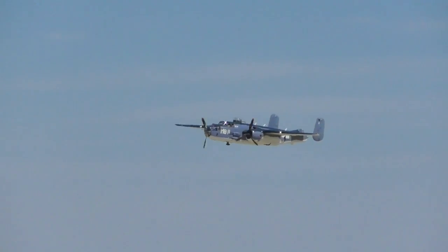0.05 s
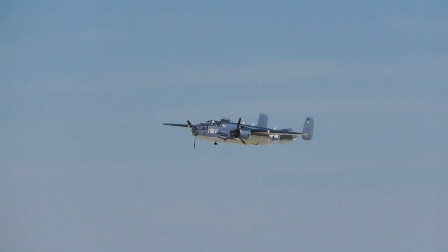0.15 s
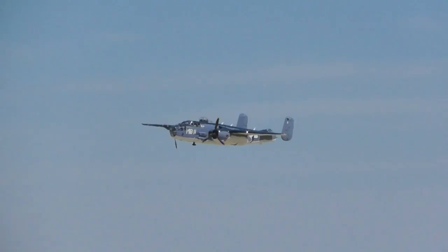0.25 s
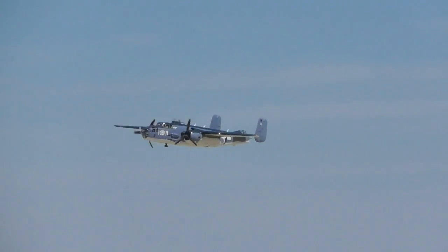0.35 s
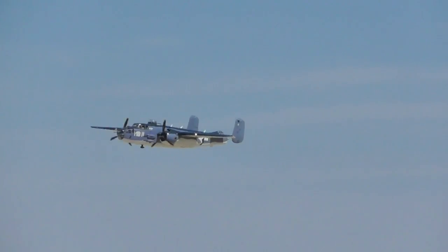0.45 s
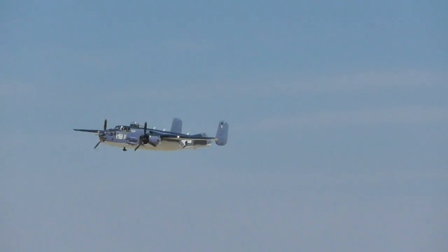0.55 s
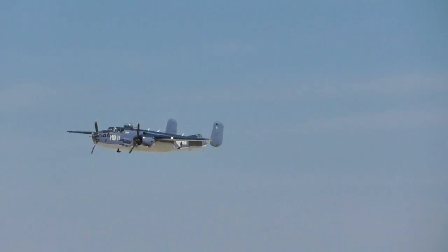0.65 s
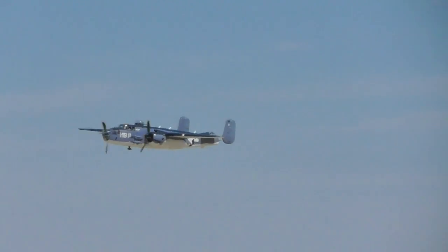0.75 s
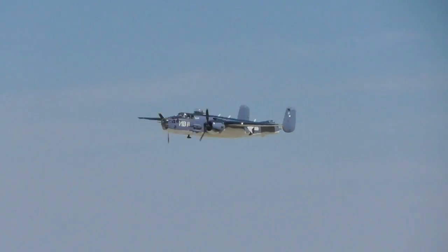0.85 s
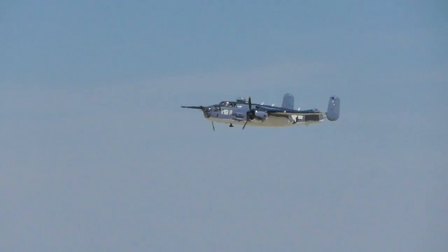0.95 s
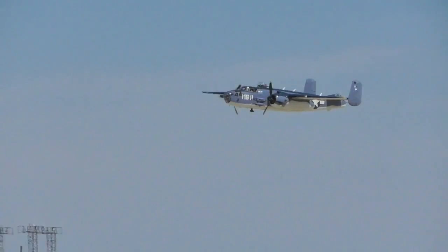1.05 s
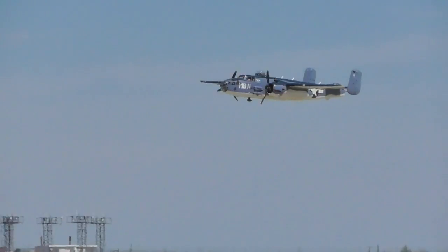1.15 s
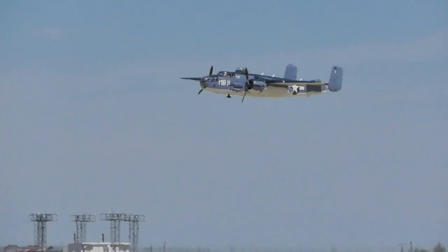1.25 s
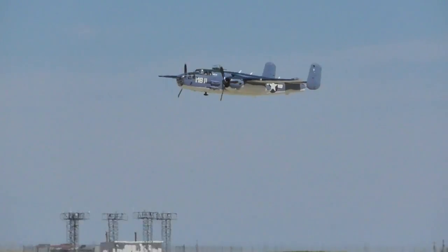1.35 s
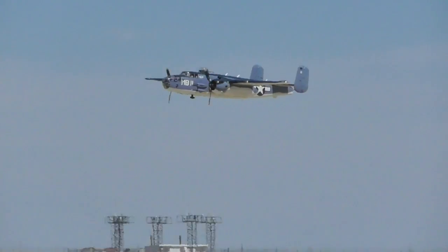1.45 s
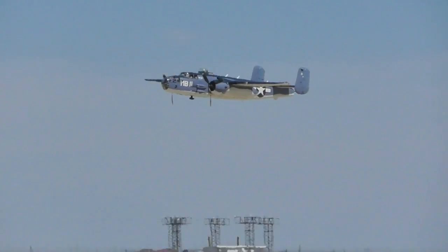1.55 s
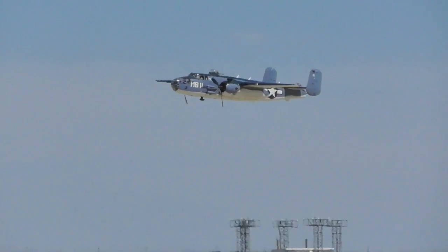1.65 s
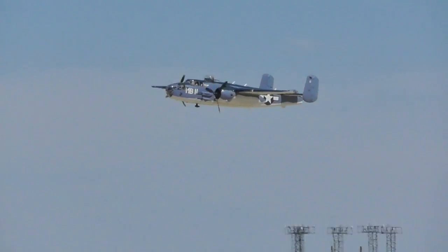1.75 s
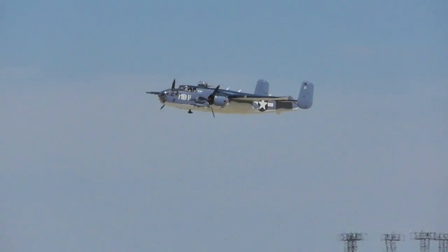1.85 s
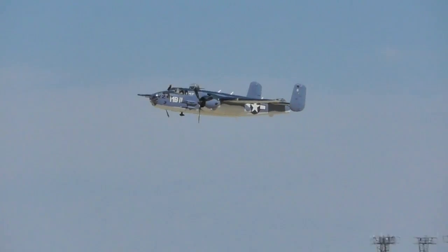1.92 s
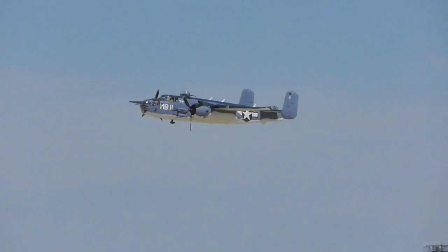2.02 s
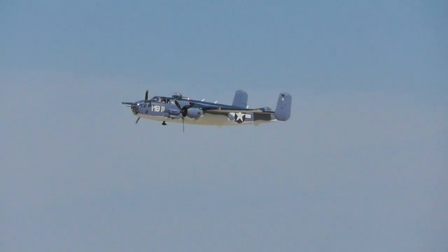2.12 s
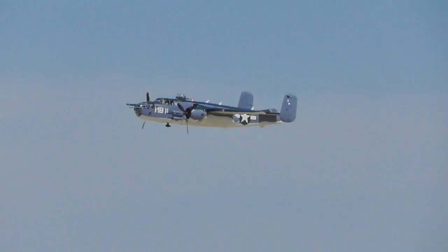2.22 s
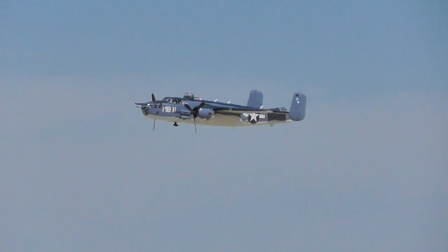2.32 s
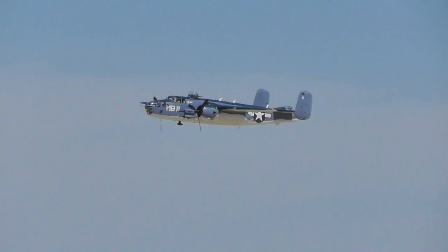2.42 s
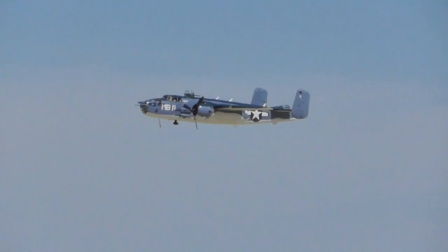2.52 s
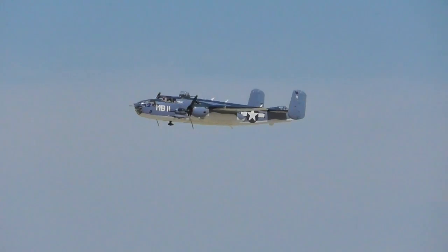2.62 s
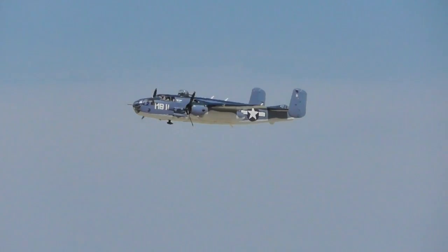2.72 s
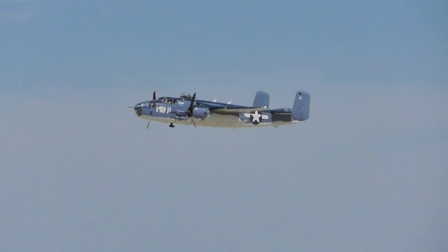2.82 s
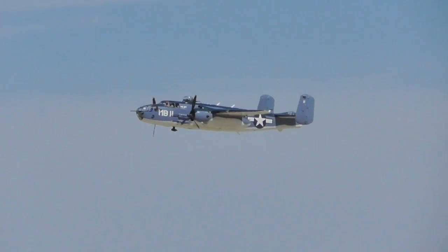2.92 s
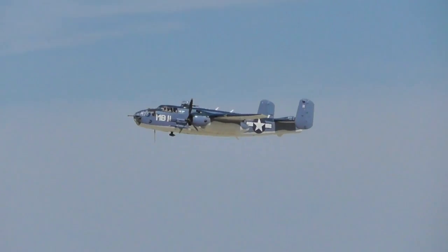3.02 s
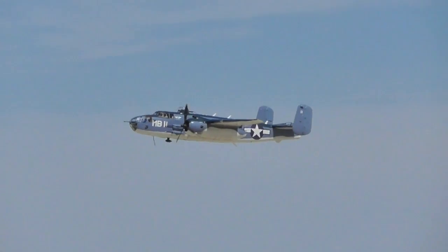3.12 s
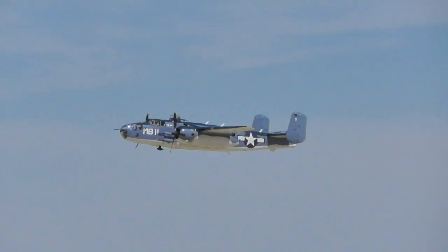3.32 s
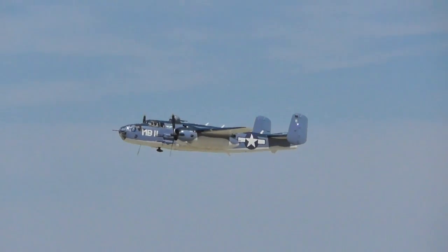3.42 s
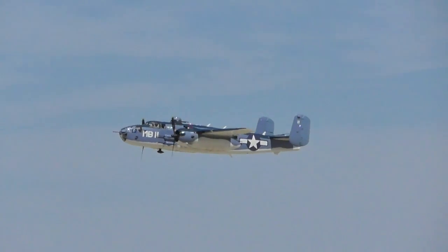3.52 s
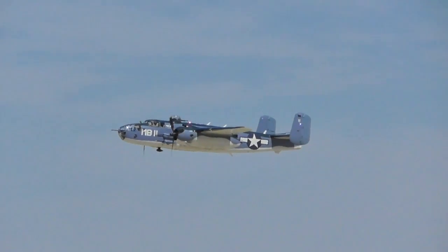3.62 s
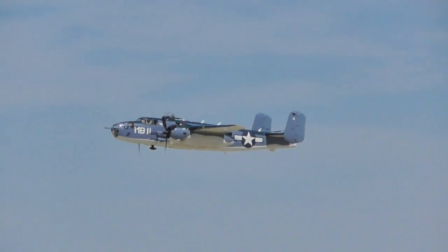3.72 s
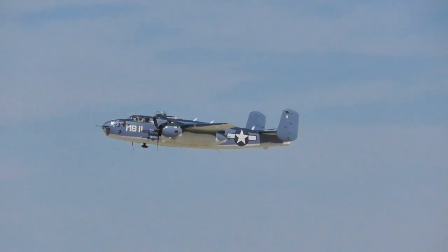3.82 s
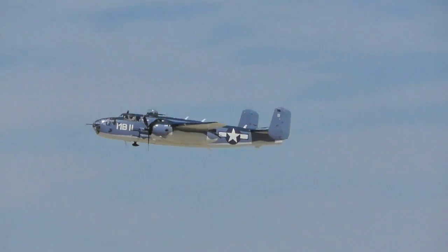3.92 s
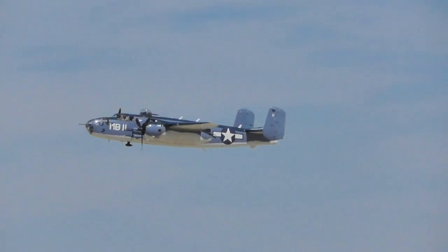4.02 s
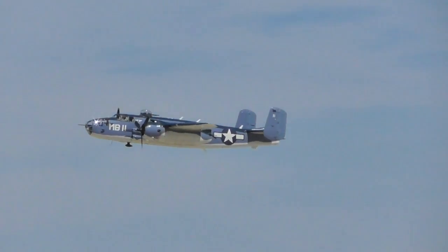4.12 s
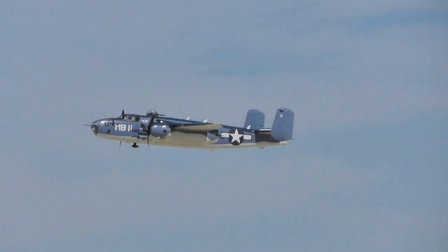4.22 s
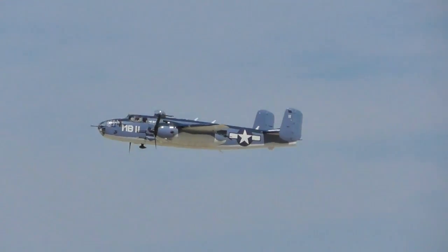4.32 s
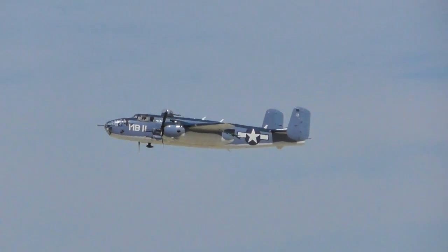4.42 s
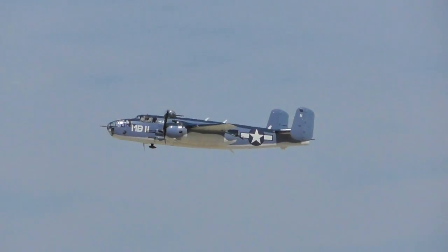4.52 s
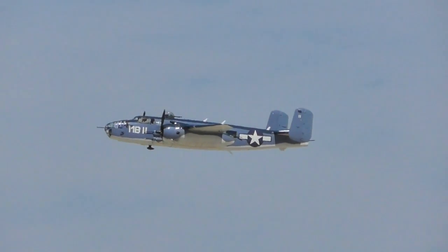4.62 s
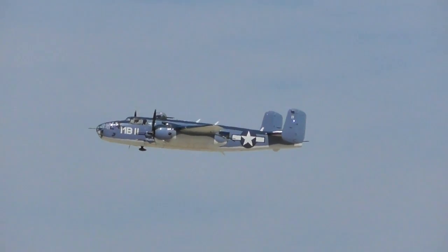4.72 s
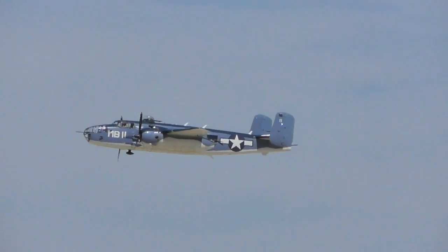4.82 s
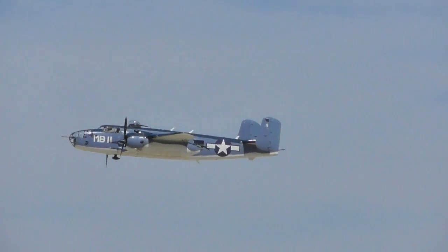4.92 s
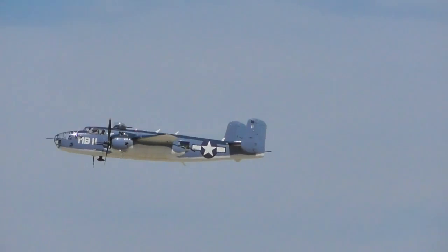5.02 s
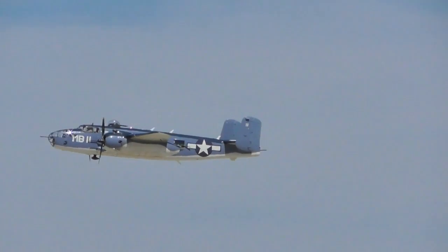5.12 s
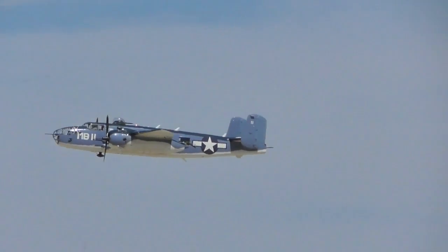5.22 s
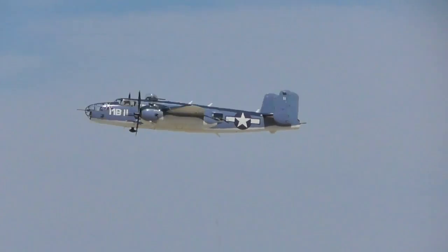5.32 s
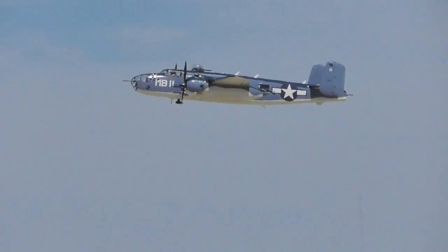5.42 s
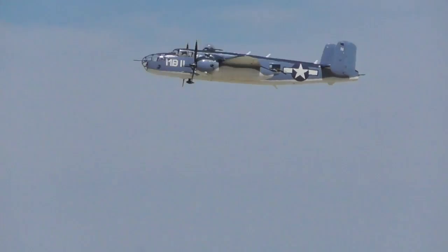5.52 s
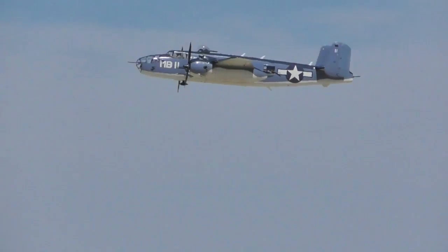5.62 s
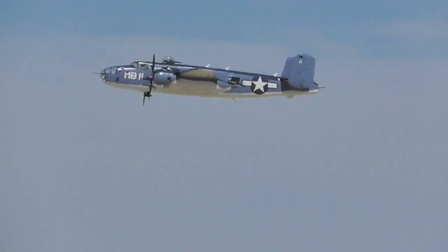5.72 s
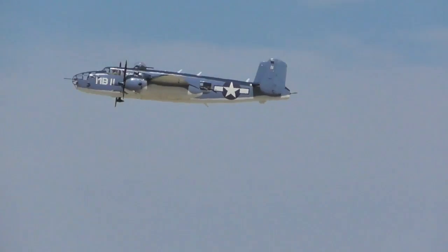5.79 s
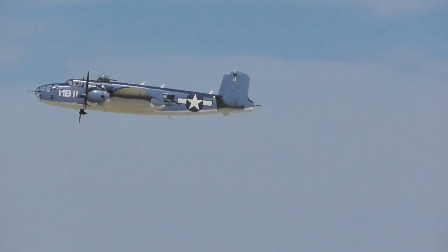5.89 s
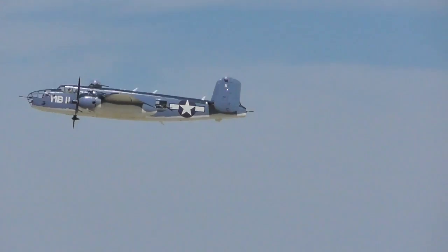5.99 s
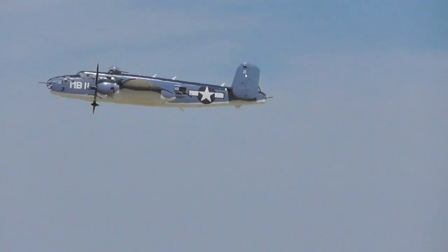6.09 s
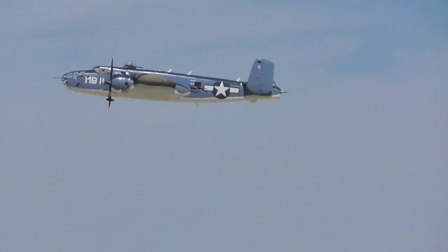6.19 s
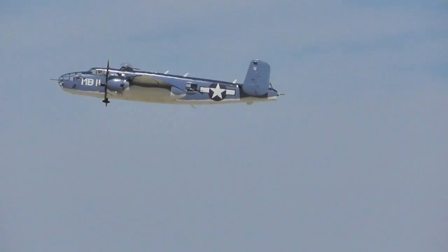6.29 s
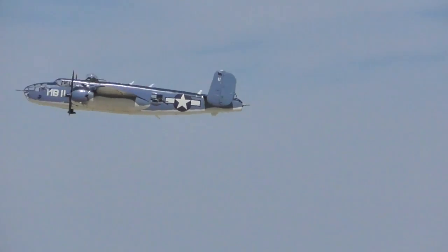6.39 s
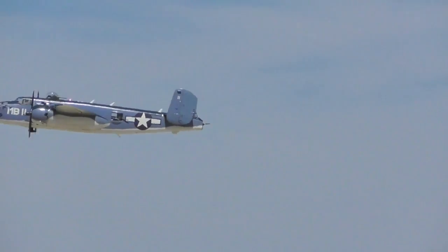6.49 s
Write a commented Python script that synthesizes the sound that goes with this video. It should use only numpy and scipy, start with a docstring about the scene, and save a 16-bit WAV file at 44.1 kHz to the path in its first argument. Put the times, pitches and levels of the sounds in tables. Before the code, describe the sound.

Two big piston engines with slapping propellers approach across a breezy airfield, pitch slowly sinking, bass throbbing, harsh treble flaring near the end.

```python
"""A twin radial-engined aircraft approaches across an airfield, heard on a small stereo camera in a breeze.
From the start a ground machine hums under far-off exhaust orders, whose pitch falls throughout with Doppler.
Two three-blade propellers run slightly apart and beat; both roar in puffs at each pass, the faster one's tips
rasp, and bass, middle and treble swell apart in unsteady air. Gusts rumble on each microphone and a heavier
one thumps both near 5.5 s; the propellers' treble peaks near 6.1 s."""
import sys
import numpy as np
from scipy import signal
from scipy.fft import rfft, irfft, dct, next_fast_len
from scipy.io import wavfile
from scipy.ndimage import uniform_filter1d

SR = 44100
rng = np.random.default_rng(int(sys.argv[2]) if len(sys.argv) > 2 else 0)


def store_wav(level_fs):
    """Save 16-bit WAV to argv[1]."""
    pcm = np.round(np.clip(np.atleast_2d(level_fs), -1, 1) * 32767)
    wavfile.write(sys.argv[1], SR, pcm.T.astype(np.int16))


N = 288840
BINS_HZ = np.arange(N // 2 + 1) * SR / N


def undb(db):
    """Decibels to gain."""
    return 10 ** (np.asarray(db) / 20)


def unit(x):
    """Scaled to rms 1."""
    return x / np.sqrt(np.mean(x ** 2))


def curves(table):
    """Columns of a (time [s], ..) table at every sample."""
    time_s, *columns = np.transpose(table)
    return [np.interp(np.arange(N) / SR, time_s, column) for column in columns]


def at_hz(table, hz, axis=1):
    """A column of a (frequency [Hz], ..) table read on a log-frequency axis."""
    t = np.array(table)
    return np.interp(np.log(hz + 1e-9), np.log(t[:, 0]), t[:, axis])


def coloured(x, spectrum):
    """Filters a sound by a (frequency [Hz], level [dB]) table and scales it to rms 1."""
    return unit(irfft(rfft(x) * undb(at_hz(spectrum, BINS_HZ)), N))


def noise(spectrum):
    """Unit noise of a given colour."""
    return coloured(rng.standard_normal(N), spectrum)


def walk(rate_hz):
    """Random levels, one per 1 / rate_hz, smoothed twice over that time; spread near 1."""
    hold = int(SR / rate_hz)
    steps = np.repeat(rng.standard_normal(N // hold + 1), hold)
    return 1.5 * uniform_filter1d(uniform_filter1d(steps, hold), hold)[:N]


def bands(x, edges_hz):
    """Splits a sound into neighbouring bands with soft edges that sum to the whole."""
    hz = np.arange(N) * SR / (2 * N)
    below = [0] + [1 / (1 + (hz / edge) ** 8) for edge in edges_hz] + [1]
    spectrum = dct(x, norm="ortho")
    return [dct(spectrum * (hi - lo), type=3, norm="ortho") for lo, hi in zip(below, below[1:])]


def hum():
    """Machine on the ground: harmonics of its rate, each wavering slightly in level."""
    rate_hz = 70.74
    # machine lines: (multiple of its rate, rms level [dB])
    lines = [(1, -50), (2, -49), (3, -62.5), (4, -57.5), (5, -57), (8, -53)]
    turns_rad = 2 * np.pi * rate_hz * np.arange(N) / SR
    total = 0
    for k, db in lines:
        level = np.sqrt(2) * undb(db + 0.67 * walk(7.1))
        total = total + level * np.sin(k * turns_rad + rng.uniform(0, 2 * np.pi))
    return total


def wind(buffet_db=1.8, right_db=1.5):
    """Gusts rumble on each microphone alone, in quick lumps; one heavier gust thumps both."""
    # strength of the breeze: (time [s], level [dB])
    gusts = [(0, -44), (.32, -43), (.55, -38.5), (1.0, -35), (1.45, -41), (2.0, -42.5), (2.5, -39),
             (3.3, -49), (3.95, -42.5), (4.8, -47.5), (5.35, -28), (5.6, -33), (6.0, -28), (6.55, -29.5)]
    # rumble colour: (frequency [Hz], relative density [dB per Hz])
    rumble_colour = [(15, -19), (30, -2.5), (55, -0.5), (90, 7), (170, -2.5), (300, -3.5), (550, -15),
                     (850, -25.5), (1200, -32.5), (2000, -79)]
    # thump colour: (frequency [Hz], relative density [dB per Hz])
    thump_colour = [(12, -11.5), (30, 9), (55, 15), (90, -16.5), (200, -68)]
    thump_s, thump_db, rise_db_s, fall_db_s = 5.48, -28, 75.5, 51.5
    gust_db = curves(gusts)[0] + 1.1 * walk(5)
    late_s = np.arange(N) / SR - thump_s
    thump = noise(thump_colour) * undb(thump_db + np.minimum(rise_db_s * late_s, -fall_db_s * late_s))
    sides = [noise(rumble_colour) * undb(gust_db + side_db + buffet_db * walk(25))
             for side_db in (-right_db / 2, right_db / 2)]
    return thump + np.array(sides)


def swells(hz):
    """Level change [dB] at one frequency as unsteady air briefly focuses parts of the propeller sound."""
    # swells: (time [s], half length [s], centre [Hz], lift [dB])
    swell_list = [(0.53, 0.077, 130, 11.5), (0.67, 0.15, 820, 10), (1.14, 0.087, 230, 5),
                  (1.23, 0.2, 1100, 2.5), (1.446, 0.03, 590, 6.5), (2.5, 0.074, 190, 12),
                  (2.493, 0.072, 510, 2), (2.79, 0.22, 185, 13.5), (3.6, 0.069, 960, 6),
                  (3.74, 0.1, 160, 12), (3.842, 0.023, 2400, 11), (3.895, 0.086, 630, 8),
                  (4.166, 0.14, 660, 4.5), (4.19, 0.082, 1600, 6), (3.9, 0.064, 1000, 3),
                  (0.12, 0.2, 400, 3.5), (3.8, 0.068, 140, 5.5), (4.1, 0.033, 450, 2),
                  (4.3, 0.03, 2200, 2.5), (5.255, 0.065, 520, 8), (4.8, 0.048, 450, 4.5),
                  (5.6, 0.07, 590, 2.5), (5.35, 0.2, 140, 4.5), (5.38, 0.044, 2400, 6),
                  (5.79, 0.071, 130, 6), (5.938, 0.054, 2400, 11), (5.939, 0.063, 220, 7),
                  (6.01, 0.082, 633, 11.5), (5.985, 0.049, 330, 3.5), (6.046, 0.063, 1400, 6.5),
                  (6.067, 0.034, 2230, 10), (6.419, 0.079, 273, 8), (6.42, 0.062, 1000, 6),
                  (6.296, 0.034, 1600, 6.5), (6.3, 0.032, 2700, -1), (5, 0.043, 240, 5), (6.3, .15, 210, 2),
                  (7, 0.039, 800, 3), (4.7, 0.17, 80, 5), (5.8, .1, 80, 5), (1.2, .1, 80, 5),
                  (5.22, 0.11, 140, 7.5), (5.25, 0.076, 1900, 5), (5.23, .1, 250, 7), (4.03, 0.088, 550, 4),
                  (3.72, .08, 600, 3), (5.0, .1, 240, 4), (6.42, .05, 4200, 4), (5.26, .06, 1900, 4),
                  (4.03, .1, 2600, 3), (5.27, .05, 700, 4)]
    width_octaves = 0.52
    flatness = 3  # above 2: holds its top, drops off quickly
    t = np.arange(0, N + 100, 100) / SR
    lift_db = 0
    for time_s, half_s, centre_hz, db in swell_list:
        in_time = np.abs((t - time_s) / half_s) ** flatness
        in_pitch = (np.log2(hz / centre_hz) / width_octaves) ** 2
        lift_db = lift_db + db * np.exp(-in_time - in_pitch)
    return curves(np.transpose([t, lift_db]))[0]


def exhaust(turns_rad):
    """Orders of the engine cycle from uneven exhaust stacks; each wavers on its way through the air."""
    # exhaust orders: (multiple of the cycle rate, relative level [dB])
    orders = [(2, -31), (3, -5.5), (4, 2.5), (5, 9), (6, -6), (7, -8.5), (8, -15.5), (9, -11), (10, -22.5),
              (12, -10.5), (14, -24), (18, -26), (21, -20.5), (22, -6.5), (23, -27.5), (24, -32)]
    # rise and fall of the fourth order against the others: (time [s], lift [dB])
    fourth = [(0, 0), (.6, 2), (1, -0.5), (1.8, 1), (2.2, -3), (2.55, 5.5), (3, -7), (3.4, 0.5),
              (3.8, -4.5), (4.2, 2), (4.6, 0), (5, 8), (5.3, 7), (5.8, 6), (6.1, 2.5), (6.55, -1)]
    fourth_db = curves(fourth)[0]
    total = 0
    for k, db in orders:
        level = undb(db + 1.2 * walk(5) + fourth_db * (k == 4))
        total = total + level * np.sin(k * turns_rad + rng.uniform(0, 2 * np.pi) + .2 * walk(6))
    return total


def blades(turns_rad, hz, slap_db, bass_db, count=36):
    """One steep suction pulse a pass; eddies shift and fade the upper harmonics, shifting less as slap grows."""
    # blade pulse with the ground's dip and lift: (frequency [Hz], relative harmonic level [dB])
    pulse_colour = [(60, 8), (90, 8.5), (160, 4), (240, -2.5), (330, -4.5), (450, 2), (600, 4.5),
                    (750, -5.5), (1200, -19), (2000, -27.5), (2800, -32.5)]
    skew_rad = 1.0  # pressure rises just before the suction
    phase_rad = turns_rad + .025 * walk(10)
    eddy = np.minimum(np.arange(count) / 5, 1)  # long waves are little affected
    scatter_rad = np.minimum(.85 * undb(-slap_db), 1)
    total = 0
    for k in range(1, count):
        level = undb(at_hz(pulse_colour, k * hz) + bass_db * (1 - eddy[k]) + 1.8 * eddy[k] * walk(5))
        total = total + level * np.cos(k * phase_rad - skew_rad + scatter_rad * eddy[k] * walk(4))
    return -total


def roar(turns_rad, puff_db):
    """Turbulent noise that flickers band by band and puffs at each blade pass, harder with stronger slap."""
    # tip and slipstream roar: (frequency [Hz], relative density [dB per Hz])
    roar_colour = [(30, -16.5), (60, -2.5), (120, -9.5), (200, -13.5), (350, -17), (450, -9), (550, -2),
                   (680, -4.5), (780, -10.5), (1000, -12.5), (1300, -17.5), (1600, -25.5), (2400, -24.5),
                   (3500, -25), (4200, -33.5), (4700, -43.5), (6000, -86)]
    puff = np.exp(.22 * undb(puff_db) * (np.cos(turns_rad) - .3))
    parts = bands(noise(roar_colour), [120, 200, 340, 550, 900, 1400, 2200, 3200])
    return puff * sum(undb(.7 * walk(14)) * part for part in parts)


def cracks(turns_rad):
    """Bright rasp of the blade tips: a steady hiss with an uneven crack at each pass."""
    # tip rasp: (frequency [Hz], relative density [dB per Hz])
    rasp_colour = [(1500, -20), (3000, -4), (4800, 0), (5600, 6), (6500, -7), (7400, -8.5), (8000, -41.5)]
    passes = np.floor(turns_rad / (2 * np.pi) + .5).astype(int)
    passes -= passes[0]
    size = undb(5 * rng.standard_normal(passes[-1] + 1))[passes]
    gate = .6 + size * np.exp(14 * (np.cos(turns_rad) - 1))
    return coloured(rng.standard_normal(N) * gate, rasp_colour)


def propellers(slow_rad, fast_rad, slow_hz, fast_hz, gained_db):
    """Slap of two propellers slightly apart in speed, mixed with their roar; slap gains on roar with treble."""
    slap_db = -4.5 + .55 * gained_db + swells(hz=413)  # slap over roar
    fast_db = .16 * gained_db  # faster propeller over slower
    slow_slap = unit(blades(slow_rad, slow_hz, slap_db, bass_db=-9))  # weak in its lowest tones
    fast_slap = unit(blades(fast_rad, fast_hz, slap_db, bass_db=1.5))
    slap = undb(slap_db) * (slow_slap + undb(fast_db) * fast_slap) / np.sqrt(1 + undb(2 * fast_db))
    puff_db = np.minimum(slap_db, 3)
    both_roar = unit(roar(slow_rad, puff_db) + roar(fast_rad, puff_db))
    return (slap + both_roar) / np.sqrt(1 + undb(2 * slap_db))


def through_air(props, bass_db, gained_db):
    """Sets the level of each propeller band: air absorbs treble most, so the top bands gain fastest."""
    # band edges [Hz]
    edges_hz = [125, 190, 340, 900, 1500, 2400, 3600]
    # bands above the lowest: (centre [Hz], level when far off [dB], gain [dB per dB of treble])
    air_bands = [(156, -52.5, 1), (257, -49, 0.907), (536, -41.5, 0.6391), (1140, -49, 0.7634),
                 (1930, -58.5, 0.9755), (2950, -71.5, 1.36), (4100, -82.5, 1.55)]
    levels_db = [bass_db - 9.5 + .15 * gained_db + swells(hz=80)]  # lowest band follows the drone
    for centre_hz, db, gain in air_bands:
        levels_db.append(db + gain * gained_db + swells(centre_hz) + 1.2 * walk(14))
    return sum(unit(band) * undb(db) for band, db in zip(bands(props, edges_hz), levels_db))


def aircraft():
    """Both engines and propellers on one falling cycle rate, after the way through the air."""
    # four-stroke cycle rate as heard, with Doppler: (time [s], rate [Hz])
    cycle = [(0, 25.15), (.5, 24.97), (1, 24.79), (1.5, 24.67), (2, 24.57), (2.5, 24.46), (3, 24.31),
             (3.5, 24.10), (4, 23.82), (4.5, 23.47), (5, 23.07), (5.5, 22.66), (6, 22.26), (6.55, 21.88)]
    # exhaust drone: (time [s], level [dB])
    drone = [(0.0, -51.5), (0.29, -51), (1.28, -34.5), (1.93, -43.5), (2.86, -30), (3.21, -34.5),
             (3.43, -28), (3.89, -26.5), (3.94, -31), (4.3, -26.5), (4.69, -33), (5.05, -30), (5.38, -27),
             (5.4, -31), (5.47, -26), (5.58, -36), (5.73, -27.5), (6.38, -25), (6.55, -26.5)]
    # propellers' treble, 2200-4500 Hz, as the aircraft nears: (time [s], level [dB])
    nearing = [(0, -64.5), (1.05, -63), (1.3, -60.5), (1.85, -62), (2.5, -60.5), (3.2, -59), (3.6, -57.5),
               (3.85, -51.5), (4.3, -53), (4.6, -54.5), (5.1, -51), (5.4, -51), (5.7, -49), (5.95, -46),
               (6.08, -39.5), (6.2, -46.5), (6.42, -43), (6.55, -45)]
    # wandering of each propeller's pulse timing: (time [s], slower, faster propeller [blade passes])
    arrival = [(0, 0, -.1), (4, -.03, -.08), (4.9, .1, -.04), (5.15, .17, -.02), (5.35, .15, .07),
               (5.6, .12, .12), (6, .1, .05), (6.55, .1, .02)]
    blades_per_cycle = 3 * 2 * 9 / 16  # three blades, two crank turns, 16:9 reduction gear
    near_speed, far_speed = .998, 1.0145  # propeller speeds over the cycle rate
    far_off_db, far_exhaust_db = -63, -11  # treble reference; far exhaust against near
    meet_s = 6.211  # propellers level here, before that wandering
    hz = curves(cycle)[0]
    turns_rad = 2 * np.pi * np.cumsum(hz) / SR
    turns_rad -= turns_rad[int(meet_s * SR)]
    bass_db = curves(drone)[0]
    gained_db = curves(nearing)[0] - far_off_db
    both_exhausts = exhaust(turns_rad) + undb(far_exhaust_db) * exhaust(far_speed * turns_rad)
    engines = unit(both_exhausts) * undb(bass_db)
    slow_ratio, fast_ratio = blades_per_cycle * near_speed, blades_per_cycle * far_speed
    slow_late, fast_late = curves(arrival)
    slow_rad = slow_ratio * turns_rad - 2 * np.pi * slow_late
    fast_rad = fast_ratio * turns_rad - 2 * np.pi * fast_late
    props = propellers(slow_rad, fast_rad, slow_ratio * hz, fast_ratio * hz, gained_db)
    rasp = cracks(fast_rad) * undb(-100 + 1.5 * (gained_db + swells(hz=3240)))
    return engines + through_air(props, bass_db, gained_db) + rasp


def scene():
    """The ports hear the aircraft and hum slightly apart in time; the camera body shades the left one's bass."""
    # port differences: (frequency [Hz], right minus left [dB], left lead [rad])
    ports = [(60, 4.5, .1), (150, 4.0, .2), (300, 2.8, .35), (640, .5, .25), (1200, .5, .16),
             (4400, .2, .14)]
    # how far the panning camera turns its shaded side to the aircraft: (time [s], share [0-1])
    shade_share = [(0, .1), (.8, .1), (1.2, .6), (2.2, .6), (3, .8), (4, 1.0), (4.8, .9), (5.2, .3),
                   (5.8, .2), (6.55, .4)]
    size = next_fast_len(N + SR // 4)
    hz = np.arange(size // 2 + 1) * SR / size
    lag = np.exp(-.5j * at_hz(ports, hz, axis=2))
    shade = undb(at_hz(ports, hz) / 2)
    spectrum = rfft(aircraft() + hum(), size)

    def stereo(tilt):
        """Left and right get opposite halves of the difference."""
        return np.array([irfft(spectrum * t, size)[:N] for t in (1 / tilt, tilt)])

    clear, shaded = stereo(lag), stereo(lag * shade)
    return clear + curves(shade_share)[0] * (shaded - clear) + wind()


def record(dry):
    """Preamplifier hiss, mostly common to both sides, then a steep cut at the top."""
    # hiss colour: (frequency [Hz], relative density [dB per Hz])
    hiss_colour = [(3000, -7), (5500, 1.5), (8000, 7.5), (9700, 3.5), (10500, -1), (13000, -4.5)]
    common_db, top_hz = -81, 12750
    apart = .45 * noise(hiss_colour) * np.array([[1], [-1]])
    hiss = undb(common_db + 1.2 * walk(16)) * (noise(hiss_colour) + apart)
    low_pass = signal.ellip(8, .2, 70, top_hz, fs=SR, output="sos")
    return signal.sosfilt(low_pass, dry + hiss)


dry = scene()
out = record(dry)
store_wav(out)
```